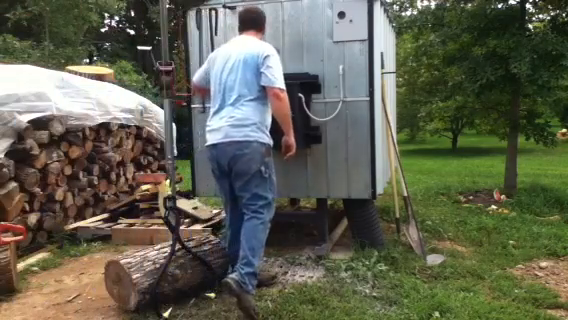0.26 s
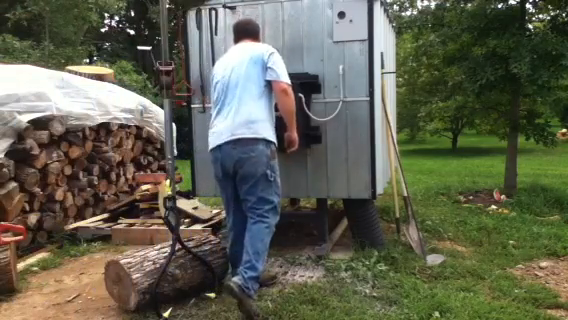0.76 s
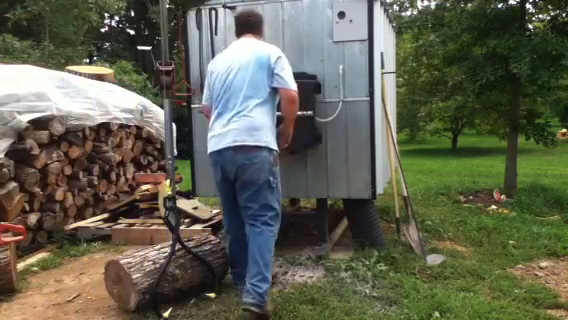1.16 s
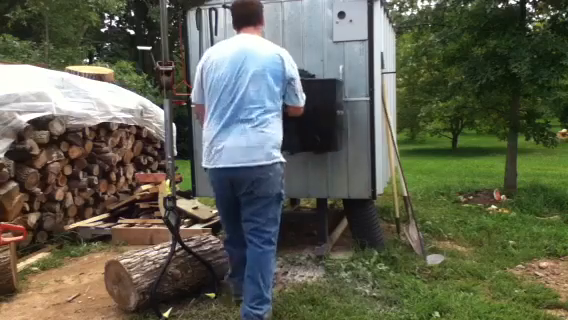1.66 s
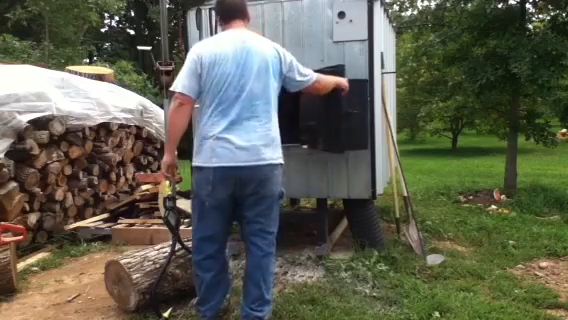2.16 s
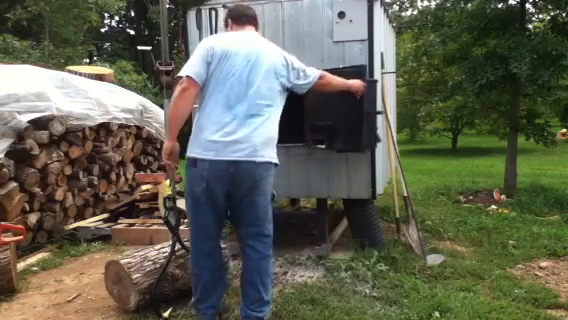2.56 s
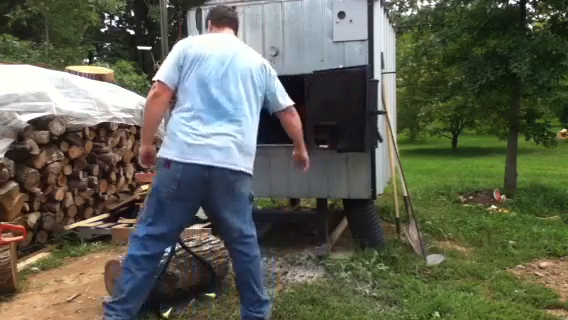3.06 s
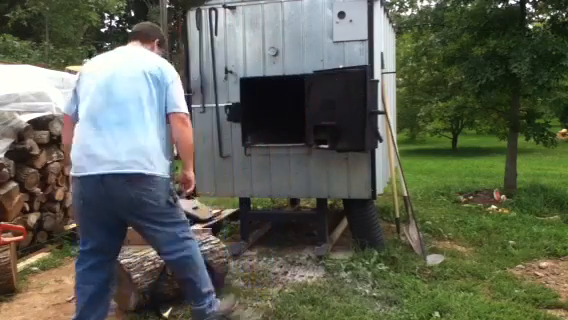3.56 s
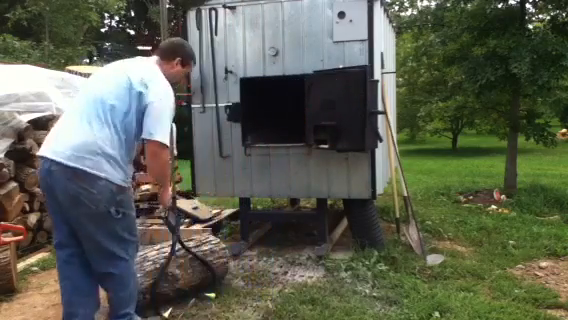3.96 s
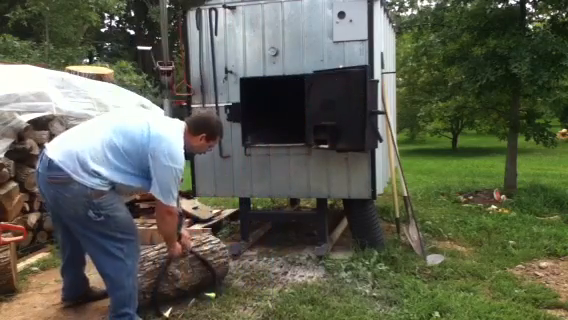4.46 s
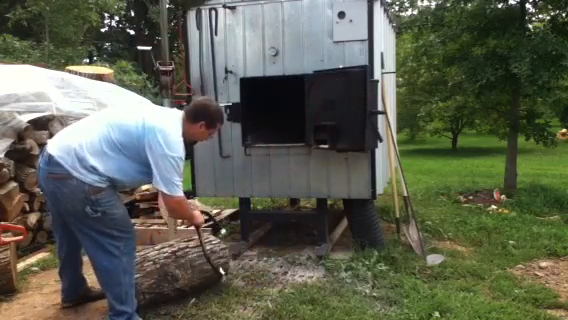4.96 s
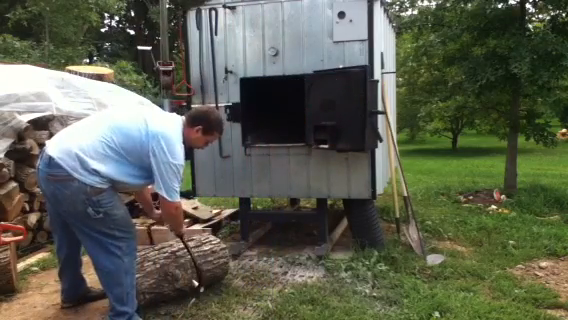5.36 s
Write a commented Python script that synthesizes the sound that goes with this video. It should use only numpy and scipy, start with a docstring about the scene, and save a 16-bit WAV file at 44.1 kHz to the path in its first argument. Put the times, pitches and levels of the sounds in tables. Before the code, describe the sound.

Faint outdoor air, a low rumble with a fine hiss, runs throughout. From the start to about 0.7 seconds, the latch of a steel firebox door rattles in several ringing clanks, loudest near 0.2 and 0.4, with a hollow boom behind them and a short falling squeak at the end. Soft footsteps and dull knocks follow on grass between 1 and 1.9 seconds. From 1.7 to 2 seconds the dry hinge squeals on one high note, grating and bending slightly upward as it stops. At 2.7 the door bumps its stop with a low thump. Faint scuffs and steps come between 3.2 and 4.4. From 4.5 to 4.9 seconds iron lifting tongs clink quickly on a log, with a thin, high singing as the arms slide. A few weaker clinks trail off by 5.3. Everything sounds fairly near, with weak echoes from the yard.

```python
"""The steel firebox door of an outdoor wood boiler opens: the latch clanks and squeaks, the hollow firebox
booms, the dry hinge squeals as it sticks and slips, and the door bumps its stop.
A man steps across the grass with soft thuds and scuffs, then sets iron lifting tongs on a log.
Their arms clink as they knock together and sing as they slide.
Faint outdoor air lies under it all, and sheds and trees send back weak echoes."""
import sys
import numpy as np
from scipy import signal
from scipy.fft import rfft, irfft, next_fast_len
from scipy.io import wavfile
from scipy.ndimage import uniform_filter1d

SR = 44100
rng = np.random.default_rng(int(sys.argv[2]) if len(sys.argv) > 2 else 0)


def int16_out(signal):
    """Quantize to a 16-bit WAV file."""
    q = np.round(np.clip(np.atleast_2d(signal).T, -1, 1) * 32767)
    wavfile.write(sys.argv[1], SR, q.astype(np.int16))


N = 246959

# Levels in the tables are relative. Brightness tips a sound toward its highs (+) or lows (-).
# tone of the outdoor air: pitch_hz, level_db
AIR_TONE = [(12, -46), (20, -20), (27, -28), (49, -2), (153, 0.5), (274, -4), (439, -9.5), (505, -9),
            (549, -11.5), (597, -10), (667, -11), (1130, -15.5), (1410, -19.5), (8880, -23), (15500, -26)]
# clanks of latch and door, each a short rattle:
# start_s, level_db, brightness_db_per_octave, ring_db, length_s, swell_db, boom_db
DOOR_CLANKS = [(0.006, -58, -13.5, 5.5, 0.019, -13, -44.5), (0.078, -32.5, -3.5, -7, .034, -34, -44),
               (0.14, -47, -5, 3, 0.021, 5.5, -52), (0.204, -33.5, 6, -2, .01, -0.5, -52),
               (0.222, -21.5, 2.5, -5, .046, -11.5, -25.5), (0.356, -27, -6, -2.5, .02, -12.5, -45),
               (0.396, -21.5, 3.5, -3, .037, 3.5, -33), (0.566, -51, -10, -5, 0.016, 4.5, -34),
               (0.623, -39, -4.5, 1.5, .028, -5, -30.5), (0.6791, -28.5, -7, -5, .044, -18, -31),
               (2.736, -35.5, -3, -9.5, .024, -8, -29.5)]
# tone of the door plate's many short vibrations: pitch_hz, level_db
DOOR_TONE = [(60, -25.5), (130, -6), (300, -9), (450, 3.5), (650, 7), (1000, 7.5), (1600, 1.5),
             (2100, -7.5), (3200, -14), (4800, -36), (8000, -35.5), (15000, -104)]
# clear notes of the steel door (ring_s is the time to fade by 60 dB): pitch_hz, level_db, ring_s
DOOR_NOTES = [(199.4, -15, 0.55), (278.4, -25.5, 1), (435, -15.5, 0.7), (515, -11, 0.11), (549, -5.5, 0.6),
              (588.4, -3.5, 0.2), (650, -14, 0.31), (699, 2.5, 0.057), (820, -22, 0.19), (943, -7.5, 0.27),
              (1000.7, 2, 0.1), (1040, -25.5, 0.16), (1078, -4, 0.1), (1200, -12, 0.19), (1264, -5.5, 0.2),
              (1437, -8.5, 0.14), (1597, -15, 0.12), (1637, -6, 0.1), (1650, -23, .12), (1960, -10, 0.11),
              (2324, -22.5, 0.2), (2780, -15, 0.1), (3450, -21, 0.085)]
# low notes of the hollow firebox: pitch_hz, level_db, ring_s
FIREBOX_NOTES = [(121.2, -0.5, 0.37), (143, -8, 0.26), (161, -11, 0.12), (243, -33.5, 0.24)]
# echoes off sheds and trees: delay_s, level_db
ECHOES = [(.055, -20.5), (.115, -30.5), (.185, -33.5), (.33, -41.5)]
# rubs of latch, hand, boot and bark: start_s, length_s, level_db, pitch_hz, width_octaves
SCUFFS = [(0.205, 0.017, -39, 3080, 0.56), (0.207, 0.014, -53, 6500, 0.33), (2.682, 0.012, -53, 5260, 1.2),
          (2.688, 0.054, -52.5, 4300, 2.1), (3.255, 0.052, -60.5, 1170, 1.3),
          (3.387, 0.05, -53.5, 580, 0.88), (4.019, 0.058, -58.5, 1320, 1.05),
          (4.762, 0.0028, -41, 5650, 1.15), (4.786, 0.0078, -37.5, 3900, 0.19),
          (5.244, 0.046, -61.5, 2940, 0.21)]
# footsteps and dull knocks: start_s, level_db, brightness_db_per_octave
THUDS = [(1.005, -43.5, -16), (1.185, -42, -11), (1.335, -42, -14), (1.578, -42.5, 1), (1.843, -33, -0.5),
         (1.858, -39, 0.5), (2.7365, -35.5, -2), (3.258, -43.5, -6.5), (4.362, -44.5, -11.5)]
# tone of those thuds: pitch_hz, level_db
THUD_TONE = [(70, -23), (150, -0.5), (250, -3.5), (350, 2), (500, -2), (900, -10.5), (1500, -14.5),
             (3000, -40.5), (8000, -36)]
# how the hinge squeal swells and fades: time_s, level_db
HINGE_LEVELS = [(1.69, -47.5), (1.704, -33.5), (1.722, -23.5), (1.756, -22.5), (1.848, -25.5),
                (1.91, -23.5), (1.942, -34.5), (1.988, -33.5), (2.02, -57)]
# knocks of the tongs: start_s, level_db, brightness_db_per_octave, ring_db
TONG_KNOCKS = [(4.544, -40, 0, -0.5), (4.569, -40.5, -2.5, -2), (4.594, -42.5, -2, -3),
               (4.6023, -36.5, 3.5, 1), (4.629, -48, 3, -22), (4.672, -30, 0, 1), (4.725, -43, -3, -9),
               (4.7645, -38.5, -2, -18), (4.7867, -37.5, 2, -6.5), (4.919, -44, 0, -2),
               (5.124, -49.5, -8.5, -10), (5.178, -54, -6, -10), (5.282, -55, 3, -1)]
# tone of those knocks: pitch_hz, level_db
TONG_TONE = [(500, -26), (1000, -9), (1500, 0), (1900, 0), (2500, -0.5), (3000, -4.5), (3500, -8.5),
             (4700, -8), (6500, -18), (7900, -18), (10000, -28), (15000, -35)]
# clear notes of the iron tongs: pitch_hz, level_db, ring_s
TONG_NOTES = [(1426, -12, 0.13), (1842, -7, .08), (2283, -13, 0.22), (2378, 0.5, 0.064), (2643, -7, 0.06),
              (2810, -11, 0.086), (3373, -1, 0.096), (3374, -2, 0.035), (3412, 1, 0.073), (3730, -9, 0.088),
              (4650, -20, 0.092), (5650, -9, 0.13), (6400, -24, 0.17), (7160, -22.5, 0.35),
              (7575, -22.5, 0.43), (8070, -19, 0.098), (14400, -27, .14)]
# iron sliding on iron after a knock: start_s, length_s, level_db, shift_hz
TONG_SLIDES = [(4.56, 0.036, -50, 2), (4.596, 0.028, -39.5, 20), (4.631, 0.0089, -52, 290),
               (4.684, 0.082, -48, 19), (4.754, 0.037, -59, 400)]
# notes that the sliding brings out: pitch_hz, width_hz, level_db
SLIDE_NOTES = [(5340, 62, 3), (5380, 35, -2), (5580, 34, 0.5), (5830, 71, -7)]


def from_db(db):
    """Turn decibels into a number to multiply by."""
    return 10 ** (np.asarray(db) / 20)


def unit_level(x):
    """Scale a sound so its average strength (rms) is one."""
    return x / np.sqrt(np.mean(x ** 2) + 1e-20)


def level_at(tone, hz):
    """Read a tone table at any pitch, blending evenly across octaves."""
    pitch_hz, level_db = np.transpose(tone)
    return np.interp(np.log(np.maximum(hz, 1)), np.log(pitch_hz), level_db)


def clicks(times, sizes):
    """Place a one-sample click at each time."""
    out = np.zeros(N)
    np.add.at(out, (times * SR).astype(int), sizes)
    return out


def band(x, low_hz, high_hz):
    """Keep the part of a sound between two pitches."""
    sos = signal.butter(2, [low_hz, min(high_hz, .45 * SR)], "band", fs=SR, output="sos")
    return signal.sosfilt(sos, x + 1e-18)


def fade(energy, ring_s):
    """Let energy die away by 60 dB every ring_s."""
    return signal.lfilter([1], [1, -from_db(-60 / (ring_s * SR)) ** 2], energy + 1e-18)


def air(level_db=-55.0):
    """Outdoor air is a steady distant rumble with a fine hiss on top."""
    hz = np.arange(N // 2 + 1) * SR / N
    spectrum = rfft(rng.standard_normal(N)) * from_db(level_at(AIR_TONE, hz))
    return from_db(level_db) * unit_level(irfft(spectrum, N))


def bounce(hits, gap_s, loss_db):
    """Each hit comes again a little later and weaker."""
    again = np.array(hits, float)
    again[:, 0] += gap_s * (1 + .15 * rng.uniform(-1, 1, len(again)))
    again[:, 1] -= loss_db
    return again


def rattle(clanks, count=5, uneven=0.314, scatter_db=1.1):
    """A clank is a quick, uneven run of hits that swells or fades; then the latch bar bounces once."""
    hits = []
    for start_s, level_db, brightness, ring_db, length_s, swell_db, _ in clanks:
        nudges = uneven * rng.uniform(-1, 1, count - 1)
        along = np.r_[0, np.arange(1, count) + nudges] / (count - 1)
        levels = level_db + swell_db * along + scatter_db * rng.standard_normal(count)
        run = [(when, db, brightness, ring_db) for when, db in zip(start_s + length_s * along, levels)]
        hits += [run, bounce(run[-1:], gap_s=.02, loss_db=9.5)]
    return np.vstack(hits)


def clatter(hits, tone, ring_s, tail_db, tail_s, damping):
    """A hit starts a blur of notes that drops fast, then lingers faintly; highs die sooner."""
    start_s, level_db, brightness = np.transpose(hits)[:3]
    edges = np.geomspace(60, 16000, 25)
    centres = np.sqrt(edges[1:] * edges[:-1])
    share = from_db(level_at(tone, centres) + np.outer(brightness, np.log2(centres))) ** 2
    share *= np.diff(edges)
    share /= share.sum(axis=1, keepdims=True)
    noise, out = rng.standard_normal((2, N)), np.zeros(N)
    for k, hz in enumerate(centres):
        energy = clicks(start_s, from_db(level_db) ** 2 * share[:, k])
        life = (hz / 1000) ** -damping  # ring_s and tail_s hold at 1000 Hz
        power = fade(energy, ring_s * life) + from_db(tail_db) ** 2 * fade(energy, tail_s * life)
        # close notes beat against each other but keep their total energy
        blur = band(noise[k % 2], edges[k], edges[k + 1])
        blur /= np.sqrt(uniform_filter1d(blur ** 2, size=900) + 1e-12)
        # a band takes about half a cycle to get going
        out += blur * signal.lfilter(*signal.butter(2, hz / 2, fs=SR), np.sqrt(power))
    return out


def ringing(start_s, force_db, brightness, notes, middle_hz, scatter_db):
    """Every hit rings each clear note with a slightly random strength."""
    chance, out = rng.standard_normal((len(start_s), len(notes))), np.zeros(N)
    for k, (hz, note_db, ring_s) in enumerate(notes):
        tilt_db = brightness * np.log2(hz / middle_hz) / 2
        strikes = clicks(start_s, from_db(force_db + note_db + tilt_db + scatter_db * chance[:, k]))
        decay, turn = from_db(-60 / (ring_s * SR)), 2 * np.pi * hz / SR
        feedback = [1, -2 * decay * np.cos(turn), decay * decay]
        out += (-1) ** k * signal.lfilter([0, np.sin(turn)], feedback, strikes + 1e-18)
    return out


def door():
    """The latch bar jumps along its catch and shakes the steel plate; the firebox booms behind it."""
    hits = rattle(DOOR_CLANKS)
    start_s, level_db, brightness, ring_db = hits.T
    plate = clatter(hits, DOOR_TONE, ring_s=0.089, tail_db=-10.5, tail_s=0.29, damping=0.42)
    ring = ringing(start_s, level_db + ring_db, brightness, DOOR_NOTES, middle_hz=900, scatter_db=4)
    thumps = [(clank[0], clank[-1]) for clank in DOOR_CLANKS]
    # the heavy door rocks back and thumps the firebox again
    thump_s, boom_db = np.vstack([thumps, bounce(thumps, gap_s=.062, loss_db=7.5)]).T
    boom = ringing(thump_s, boom_db, 0, FIREBOX_NOTES, middle_hz=125, scatter_db=2)
    # the bare snap of steel on steel; dull hits snap less
    snap = band(clicks(start_s, from_db(level_db + 23 + brightness)), 560, 1480)
    return snap + from_db(-3) * plate + from_db(-8.5) * ring + from_db(-2.5) * boom


def yard_echoes(x, dull_hz=3200, scatter_db=-33, fade_s=0.63):
    """Sheds and trees send back a few dull echoes, and leaves add a thin scatter."""
    t = np.arange(SR) / SR
    response = from_db(scatter_db) * rng.standard_normal(SR) * from_db(-60 * t / fade_s)
    response *= np.sqrt(2 * np.log(1000) / (fade_s * SR))  # makes scatter_db the total energy
    for delay_s, level_db in ECHOES:
        response[int(delay_s * SR)] += from_db(level_db)
    echoes = signal.fftconvolve(x, response)[:N]
    return signal.sosfilt(signal.butter(2, dull_hz, fs=SR, output="sos"), echoes)


def scuffs(grain_db=3):
    """Latch, hand, boot and bark rub in short, grainy strokes."""
    t, out = np.arange(N) / SR, np.zeros(N)
    friction = rng.standard_normal(N)
    friction *= from_db(grain_db * unit_level(band(rng.standard_normal(N), 30.4, 280)))
    for start_s, length_s, level_db, hz, octaves in SCUFFS:
        along = np.clip((t - start_s) / length_s, 0, 1)
        stroke = np.sqrt(np.abs(np.sin(np.pi * along)))
        spread = 2 ** (octaves / 2)
        out += from_db(level_db) * stroke * unit_level(band(friction, hz / spread, hz * spread))
    return out


def squeal(pitch_hz, gain, second_db, third_db, waver_hz, grain):
    """Dry steel sticks and slips, singing one wavering note with weaker overtones above it."""
    waver = unit_level(band(rng.standard_normal(N), 15, 116))
    phase = 2 * np.pi * np.cumsum(pitch_hz + waver_hz * waver) / SR
    # uneven rubbing makes the overtones flutter
    flutter = 1 + grain * unit_level(band(rng.standard_normal(N), 25, 150))
    overtones = from_db(second_db) * np.sin(2 * phase)
    overtones += from_db(third_db) * (np.sin(3 * phase) + from_db(-9) * np.sin(4 * phase))
    return np.sqrt(2) * gain * (np.sin(phase) + flutter * overtones)


def latch_squeak(start_s=.622, length_s=0.054, start_hz=2010, fall_hz_per_s=5700, fade_db_per_s=218):
    """The latch bar gives a rough, falling chirp as it leaves the catch."""
    age = np.clip(np.arange(N) / SR - start_s, 0, length_s)
    stroke = np.sqrt(np.abs(np.sin(np.pi * age / length_s)))
    gain = from_db(-43 - fade_db_per_s * age) * stroke
    pitch_hz = start_hz - fall_hz_per_s * age
    return squeal(pitch_hz, gain, second_db=-40, third_db=-34, waver_hz=35, grain=0.48)


def thuds():
    """Footsteps and dull knocks are soft, heavy hits that hardly ring."""
    return clatter(THUDS, THUD_TONE, ring_s=0.048, tail_db=-10, tail_s=.2, damping=0.16)


def hinge(start_hz=2237.5, creep_hz_per_s=45, bend_hz=51.6, slows_at_s=1.908, stalls_at_s=1.964):
    """The dry hinge sings a note that creeps upward, then grates and bends up as the door slows."""
    t = np.arange(N) / SR
    time_s, level_db = np.transpose(HINGE_LEVELS)
    age = t - time_s[0]
    slowing = np.clip((t - slows_at_s) / .06, 0, 1)
    pitch_hz = start_hz + creep_hz_per_s * age + bend_hz * slowing
    gain = from_db(np.interp(t, time_s, level_db)) * np.clip(age / .018, 0, 1) * (t < time_s[-1])
    # grating lifts the overtone at twice the pitch until the door stalls
    second_db = -27 + 21.5 * np.sqrt(slowing) - 1402 * np.clip(t - stalls_at_s, 0, 1)
    # the higher overtones bite while the hinge breaks loose
    third_db = -37.5 + 12 / (1 + (age / .036) ** 8)
    return squeal(pitch_hz, gain, second_db, third_db, waver_hz=1.5, grain=0.24)


def tong_clinks():
    """The iron arms knock at their pivot, spring back and ring briefly."""
    hits = np.vstack([TONG_KNOCKS, bounce(TONG_KNOCKS, gap_s=.0085, loss_db=5.5)])
    start_s, level_db, brightness, ring_db = hits.T
    knock = clatter(hits, TONG_TONE, ring_s=0.055, tail_db=-4, tail_s=0.15, damping=0.27)
    ring = ringing(start_s, level_db + ring_db, brightness, TONG_NOTES, middle_hz=3400, scatter_db=4.5)
    return from_db(-3) * knock + from_db(-3.5) * ring


def tong_slides(catch_s=0.0099, release_s=0.017, fade_db_per_s=58):
    """Between knocks the arms slide and sing; each slide catches quickly, weakens and lets go."""
    friction = rng.standard_normal(N)
    song = unit_level(sum(from_db(db) * unit_level(band(friction, hz - width / 2, hz + width / 2))
                          for hz, width, db in SLIDE_NOTES))
    t, gain, shift_hz = np.arange(N) / SR, np.zeros(N), np.zeros(N)
    for start_s, length_s, level_db, hz in TONG_SLIDES:
        age = np.maximum(t - start_s, 0)
        grip = np.clip(age / catch_s, 0, 1) * np.clip(1 - (age - length_s) / release_s, 0, 1)
        gain += grip * from_db(level_db - fade_db_per_s * age)
        shift_hz[t >= start_s] = hz
    # the touching point moves along the arm and shifts the pitch
    bend = np.exp(2j * np.pi * np.cumsum(shift_hz) / SR)
    return gain * np.real(signal.hilbert(song, next_fast_len(N))[:N] * bend)


def scene():
    """Add up all the sounds of the open yard in one channel."""
    near = door() + latch_squeak() + hinge() + tong_clinks() + tong_slides() + thuds() + scuffs()
    return (near + yard_echoes(near) + air())[None]


def record(dry):
    """Cut the very highest treble steeply."""
    cutoff_hz = 15850
    return signal.sosfilt(signal.ellip(12, .1, 80, cutoff_hz, fs=SR, output="sos"), dry)


dry = scene()
out = record(dry)
int16_out(out)
```